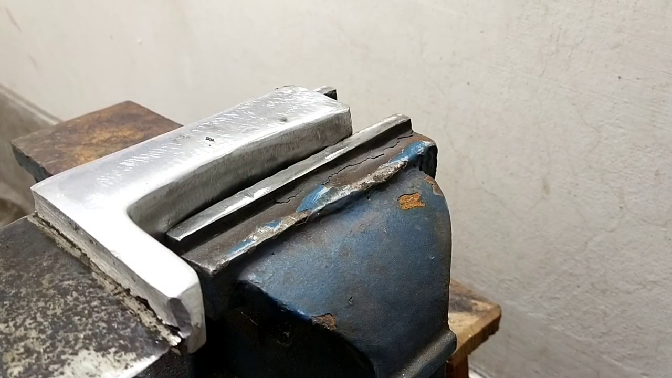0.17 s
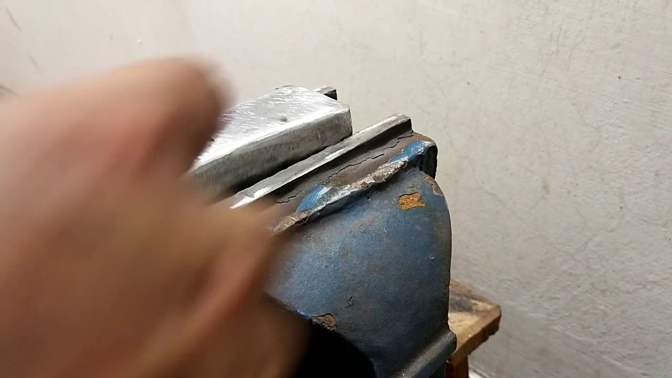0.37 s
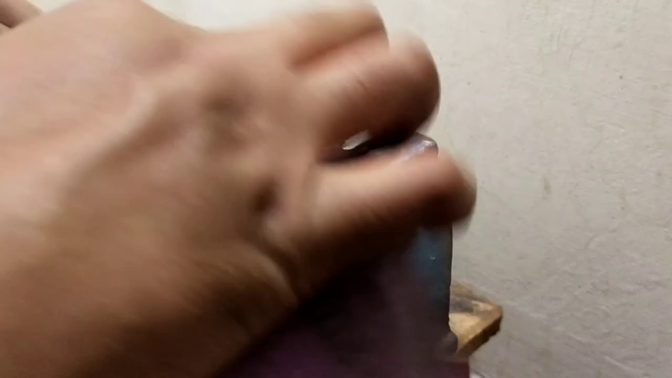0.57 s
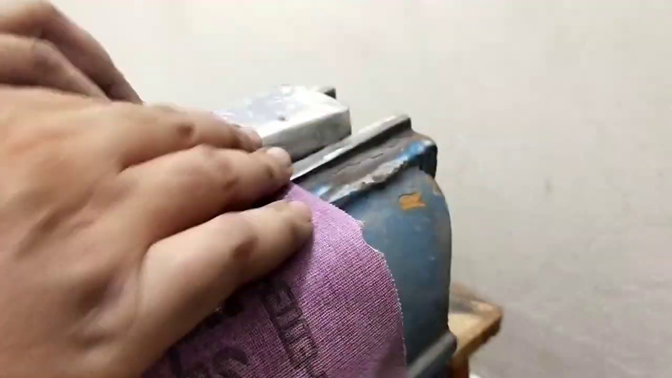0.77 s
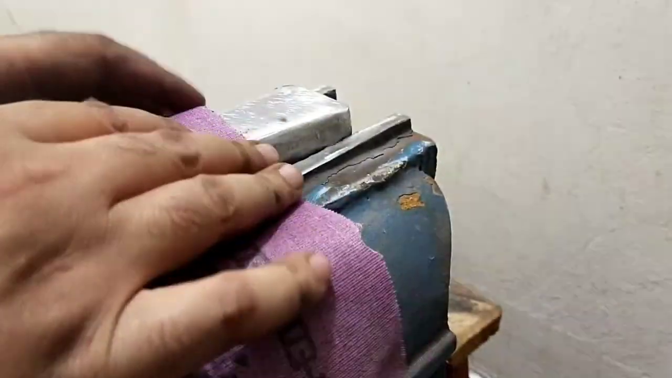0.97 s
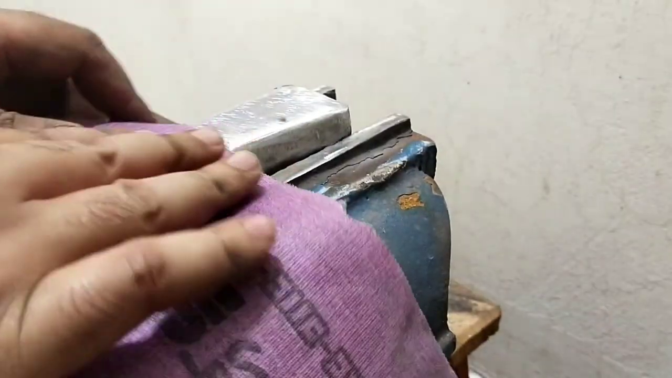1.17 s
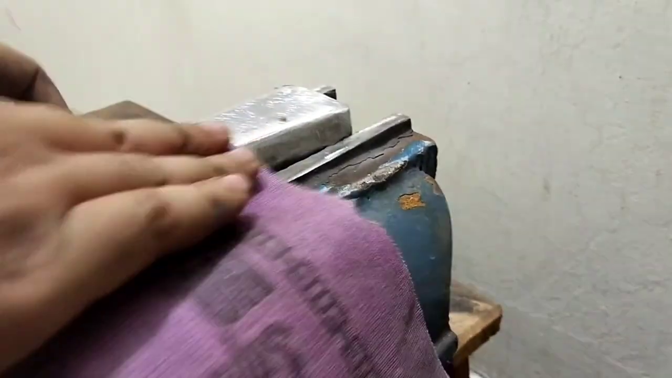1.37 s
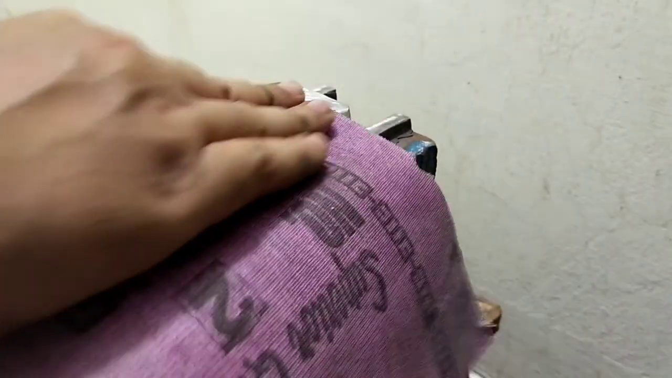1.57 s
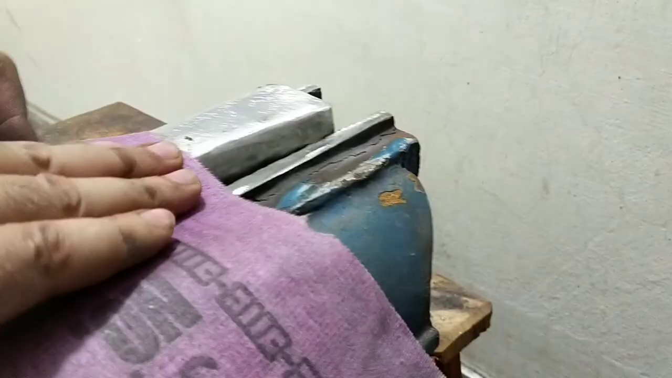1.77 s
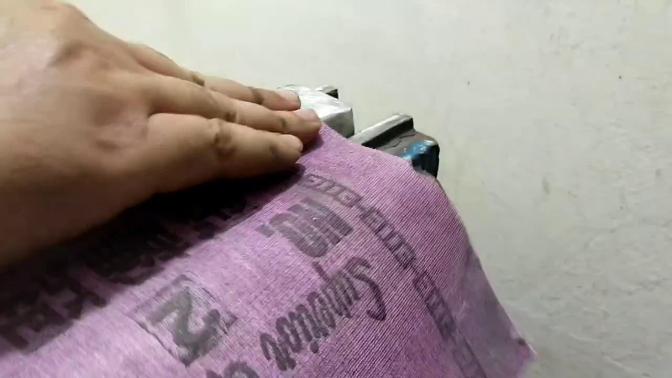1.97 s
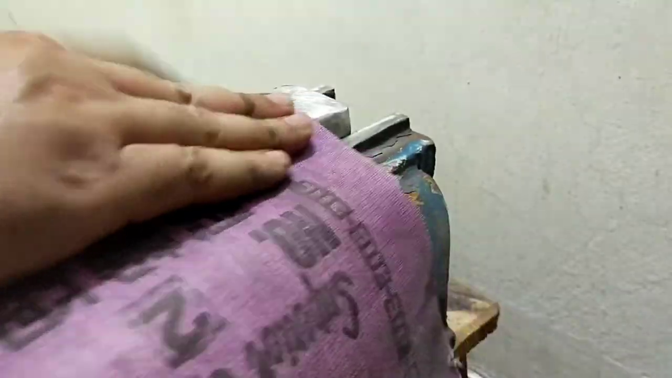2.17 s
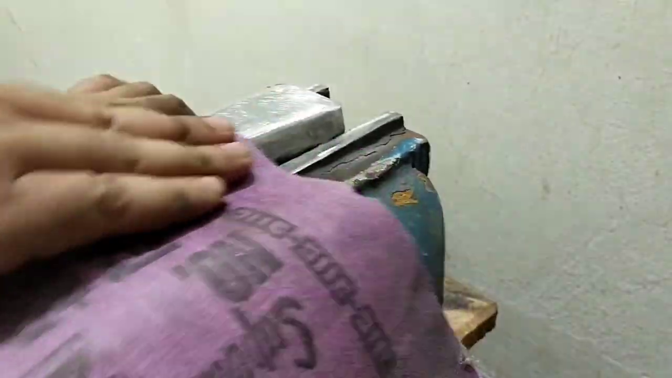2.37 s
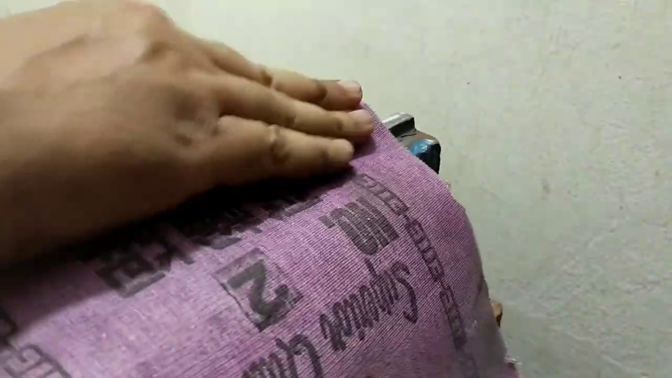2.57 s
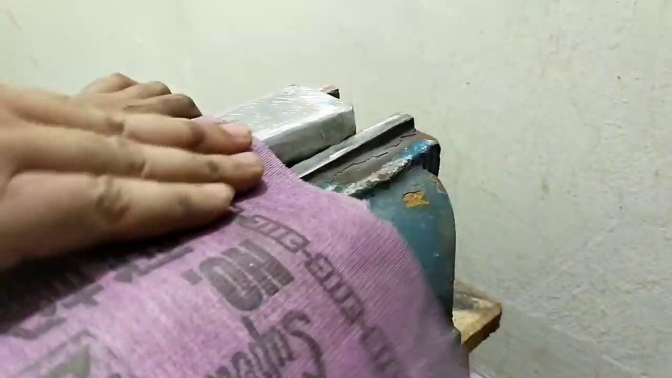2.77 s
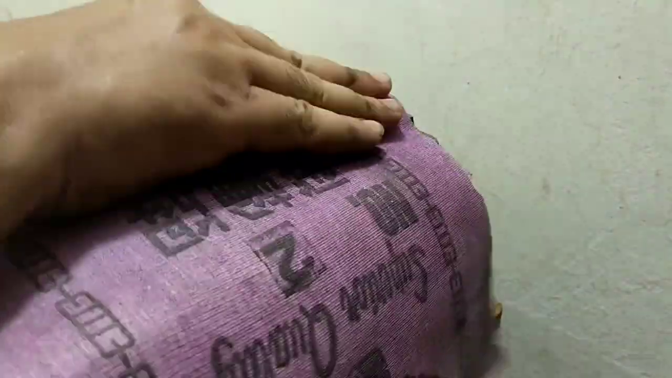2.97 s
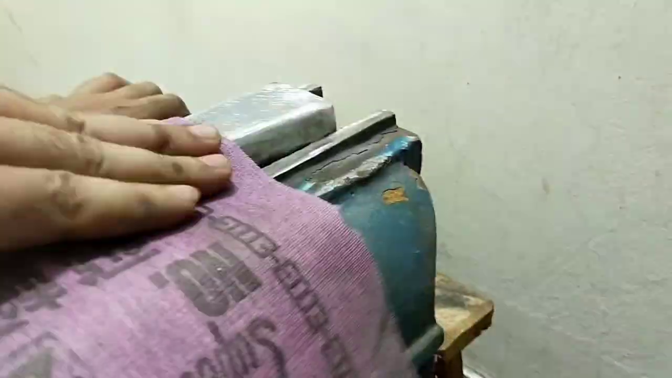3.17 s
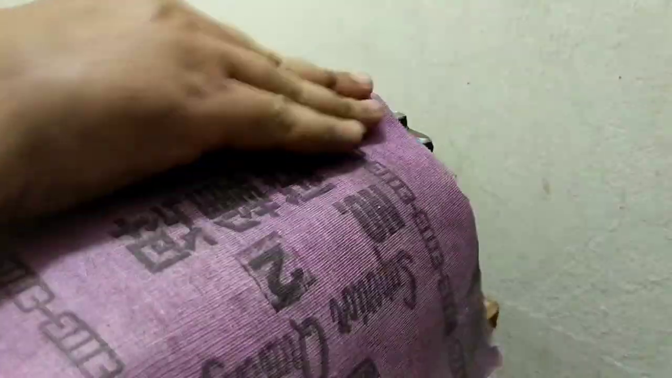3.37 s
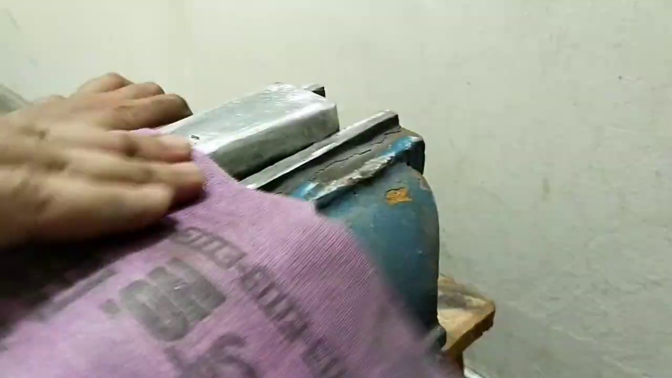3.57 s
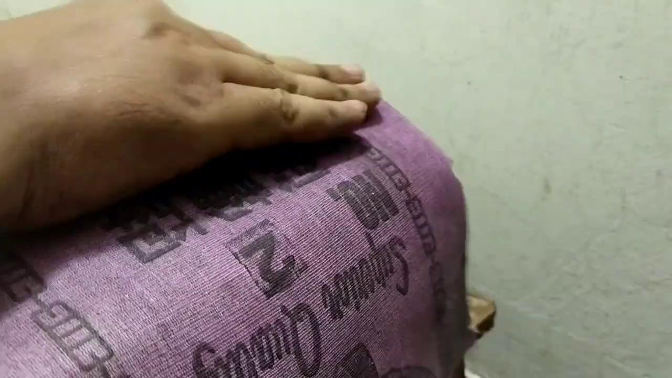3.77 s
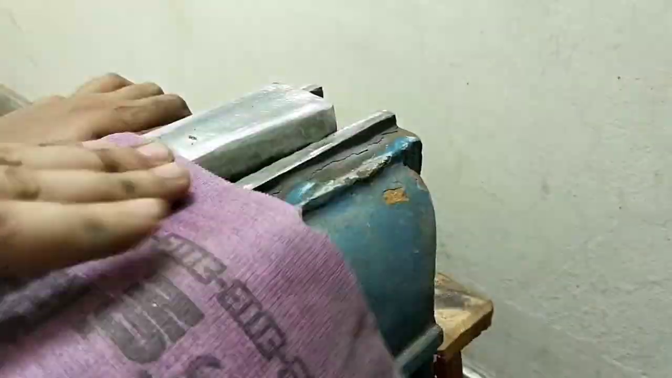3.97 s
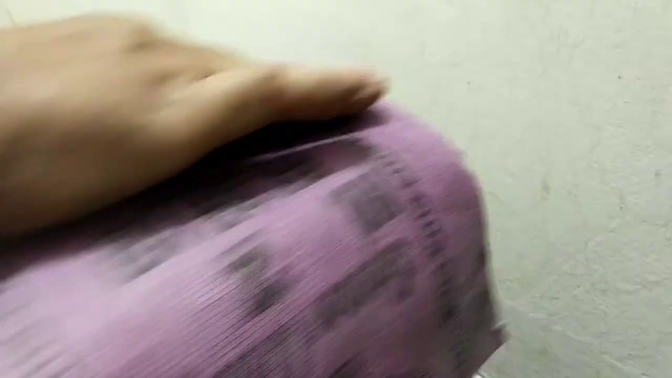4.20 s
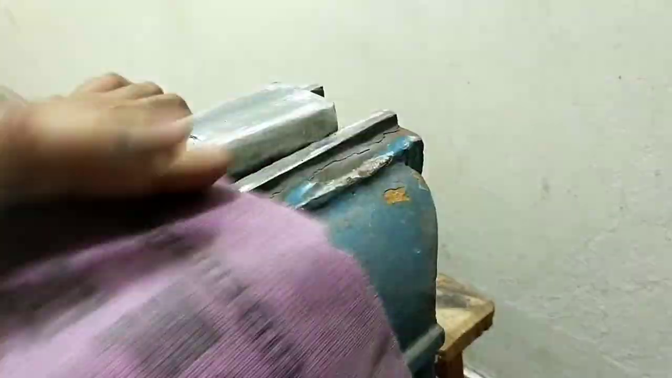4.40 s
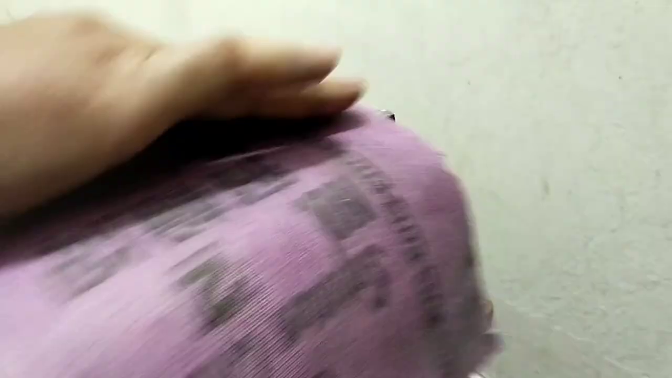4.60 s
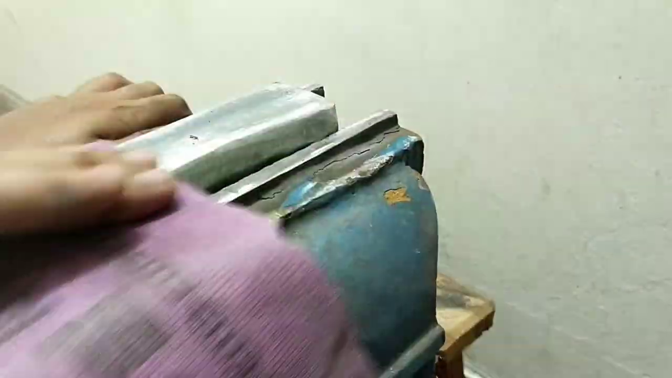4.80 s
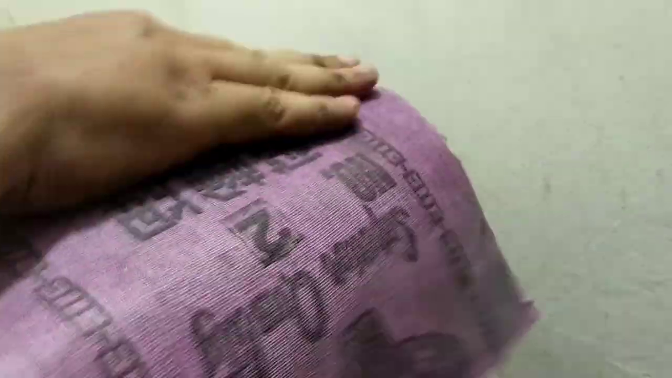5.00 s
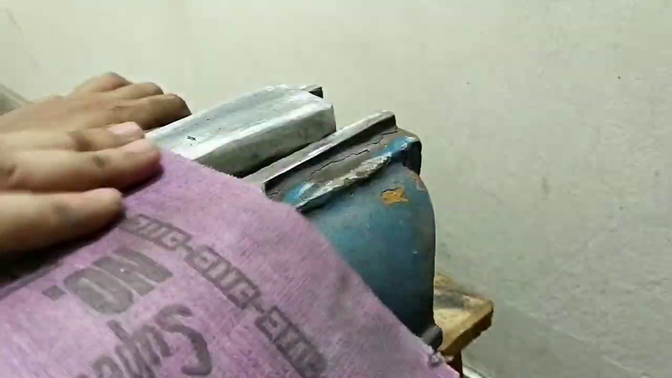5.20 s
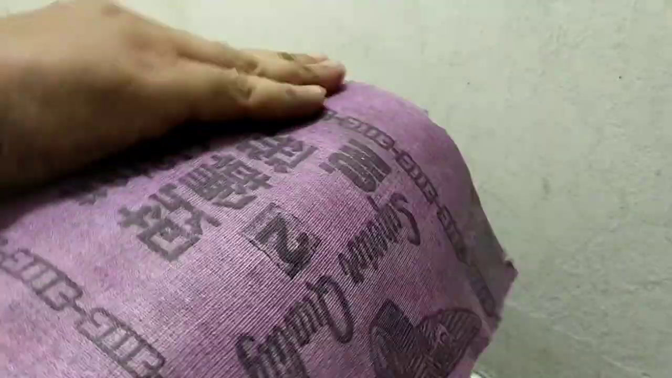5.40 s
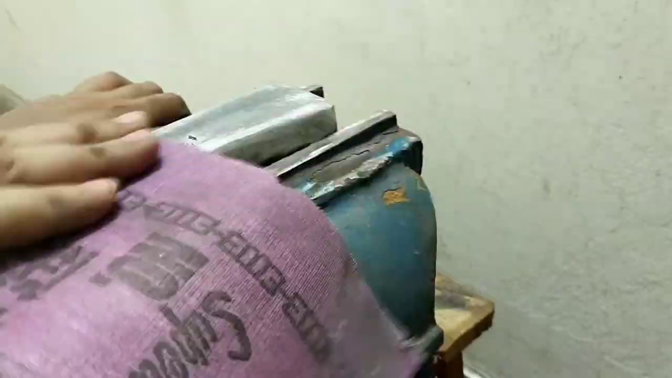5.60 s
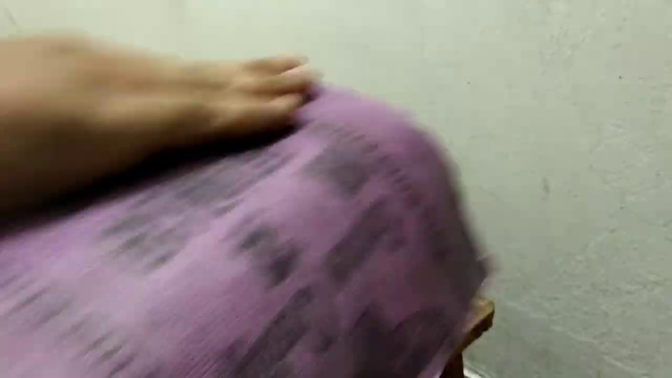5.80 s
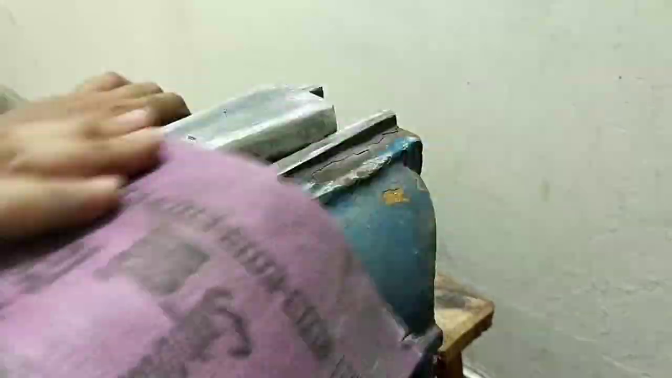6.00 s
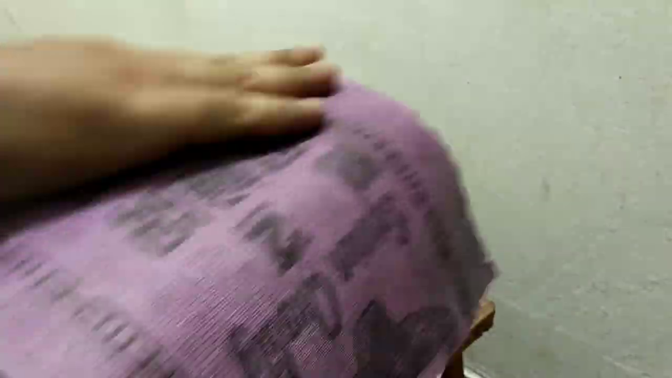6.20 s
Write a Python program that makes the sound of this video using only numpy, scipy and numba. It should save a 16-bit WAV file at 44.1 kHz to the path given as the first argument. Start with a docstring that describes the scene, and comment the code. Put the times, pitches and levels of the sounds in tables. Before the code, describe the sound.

A soft, dull knock on a workbench is followed by the rustle and crackle of abrasive cloth being laid over a steel blade in a vise. Then a hand rubs it quickly back and forth, making gritty, rasping strokes that grow louder, with occasional small snaps from the sheet. The sound is close, in a small workshop with a short echo and a faint low hum.

```python
"""In a small, humming workshop, a sheet of abrasive cloth is rubbed over a steel blade held in a vise.
After a soft knock on the bench, the sheet rustles as it is picked up and laid in place.
Then a hand pulls it to and fro: grit scratches the steel, and the taut sheet rasps and drums along.
Now and then it snaps, as the sheet buckles or a coarse grain catches."""
import numpy as np
from scipy import signal
from scipy.fft import rfft, irfft, next_fast_len
from scipy.ndimage import uniform_filter1d
from numba import njit
import sys
import numpy as np
from scipy import signal
from scipy.fft import rfft, irfft, next_fast_len
from scipy.io import wavfile
from scipy.ndimage import uniform_filter1d
from numba import njit

SR = 44100
rng = np.random.default_rng(int(sys.argv[2]) if len(sys.argv) > 2 else 0)


def pcm_store(signal):
    """Save signal as 16-bit PCM."""
    levels = np.round(np.clip(np.atleast_2d(signal), -1, 1) * 32767)
    wavfile.write(sys.argv[1], SR, levels.astype(np.int16).T)


N = 275625
TIME = np.arange(N) / SR
FFT_SIZE = next_fast_len(N + SR, True)
HZ = np.maximum(np.arange(FFT_SIZE // 2 + 1) * SR / FFT_SIZE, 1)
LEFT_RIGHT = np.array([[.5], [-.5]])  # splits a left-minus-right level between the two sides

# The hand's strokes, a push and a pull in turn, with levels relative to one another:
# start_s, level_db, speed_up_s, slow_down_s, rasp_db, drum_db, ring_hz
STROKES = [(1.383, -21.5, 0.077, 0.083, 0, -0.5, 3600.0), (1.608, -21, 0.053, 0.1, -3, 3.5, 3830),
           (1.823, -20, 0.064, 0.15, 2.5, 6.5, 3770), (2.207, -22.5, 0.099, 0.12, -1, -2.5, 2680.0),
           (2.407, -19.5, 0.054, 0.1, 2, 3, 2840.0), (2.636, -18.5, 0.036, 0.11, 1.0, 2.5, 890.0),
           (2.831, -16, 0.06, 0.12, 3, -4, 3470.0), (3.052, -13.5, 0.062, 0.093, -1, 1.5, 1160),
           (3.241, -14, 0.054, 0.11, 1.5, -1.5, 1180), (3.423, -14, 0.05, 0.088, -1, -0.5, 4200),
           (3.613, -14.5, 0.067, 0.11, 0, -1.0, 1200.0), (3.809, -13.5, 0.073, 0.11, -3, -4.5, 4150),
           (4.009, -15.0, 0.085, 0.082, 1, 0, 4030.0), (4.211, -19, 0.041, 0.078, -2.5, -2.5, 4960.0),
           (4.428, -15, 0.07, 0.1, 0, 0.5, 5350.0), (4.622, -15.5, 0.042, 0.11, -1.5, -2, 5300.0),
           (4.829, -16, 0.079, 0.099, -1.5, 1.5, 4540.0), (5.048, -13.0, 0.1, 0.11, -2.5, 1, 5230),
           (5.275, -14.5, 0.043, 0.14, 1, -3, 2110.0), (5.483, -14.0, 0.069, 0.09, -1, 0, 1960),
           (5.685, -14, 0.061, 0.13, 3.5, -0.5, 1810), (5.889, -14, 0.067, 0.098, 1.5, 1, 1940),
           (6.093, -13.5, 0.079, 0.13, 3, 1.5, 2120)]


def from_db(db):
    """Turn decibels into a number to multiply by."""
    return 10 ** (np.asarray(db) / 20)


def rms_one(x):
    """Scale a signal so that its average strength (rms) is 1."""
    return x / np.sqrt(np.mean(x ** 2) + 1e-20)


def over_time(points):
    """Join (time_s, value) points with straight lines."""
    return np.interp(TIME, *np.transpose(points))


def over_hz(points):
    """Join (pitch_hz, value) points, giving each octave the same room."""
    hz, value = np.transpose(points)
    return np.interp(np.log(HZ), np.log(hz), value)


def lifts(peaks):
    """Decibels that resonances add at each frequency."""
    return sum(db / (1 + (2 * (HZ - hz) / width) ** 2) for hz, width, db in peaks)


def filtered(x, response):
    """Turn each frequency up or down by its own gain."""
    return irfft(rfft(x, FFT_SIZE) * response, FFT_SIZE)[..., :N]


def below(hz, order=4):
    """Gains that keep what lies below hz and fade out what lies above."""
    return 1 / (1 + (HZ / hz) ** order)


def drift(rate_hz):
    """A smooth random wobble of about size 1, worked out every 40 samples."""
    keep = np.exp(-2 * np.pi * rate_hz * 40 / SR)
    noise = rng.standard_normal(N // 40 + 2002)
    slow = signal.lfilter([1], [1, -2 * keep, keep * keep], noise)[2000:]
    return np.interp(np.arange(N) / 40, np.arange(len(slow)), rms_one(slow))


def grains(per_s, spread_db):
    """Two unrelated streams of tiny hits of uneven size."""
    sizes = from_db(spread_db * np.minimum(rng.exponential(1, (2, N)), 4))
    signs = rng.choice([-1, 1], (2, N))
    hits = rng.random((2, N)) < per_s / SR
    return rms_one(sizes * signs * hits)


def radiate(pair, spectrum_db):
    """Colour two noises as one wide source: lows reach both ears alike, highs come from different spots."""
    # How alike the two ears' sounds are: pitch_hz, likeness (held to 0..1 below)
    likeness = [(100, 1.5), (700, 0.9), (1300, 1.2), (2000, -0.23), (3500, 0.1955), (7000, 0.08),
                (10000, 0.01)]
    alike = np.clip(over_hz(likeness), 0, 1)
    mid, side = filtered(pair, from_db(spectrum_db) * np.sqrt([1 + alike, 1 - alike]))
    return rms_one(np.array([mid + side, mid - side]))


def bursts(rows):
    """Levels that jump up and die away, from rows of start_s, level_db, fade_s (time to fall 60 dB)."""
    out = np.zeros(N)
    for start_s, db, fade_s in rows:
        first = int(start_s * SR)
        age = TIME[:min(N - first, SR // 2)]
        out[first:first + len(age)] += from_db(db - 60 * age / fade_s)
    return out


@njit
def resonance(x, hz, width):
    """Keep a band around a pitch that may move; width is a share of that pitch."""
    out = np.zeros_like(x)
    for side in range(2):
        band, low = 0., 0.
        for i in range(x.shape[1]):
            tuning = np.tan(np.pi * hz[i] / SR)
            passed = (band + tuning * (x[side, i] - low)) / (1 + tuning * (tuning + width))
            band, low = 2 * passed - band, low + 2 * tuning * passed
            out[side, i] = width * passed
    return out


def steady_band(x, levels, hz, width):
    """A resonance that stays at one pitch while its level follows (time_s, level_db) points."""
    return from_db(over_time(levels)) * resonance(x, np.full(N, float(hz)), width)


def background(mains_hz=100, mains_db=-9, waver_db=3.0):
    """A low rumble with a wavering hum from the mains power, and faint air noise."""
    # Tone colour of the rumble and of the air: pitch_hz, level_db
    rumble_colour = [(25, -33), (55, -12), (80, -9), (100, 4), (145, -5.5), (200, -21), (400, -55),
                     (2000, -68)]
    air_colour = [(120, -23), (200, 7.5), (1220, -5), (1490, 4.5), (1630, 0.5), (2550, -5), (2750, -2),
                  (3350, -8.5), (15000, -22)]
    # A thin, faint ring in the air noise: pitch_hz, width_hz, lift_db
    air_ring = [(2770, 50, 11)]
    # How the rumble with its hum, and the air, rise and fall: time_s, level_db
    hum_levels = [(0, -49.5), (.75, -47), (.9, -65), (2.0, -59), (2.38, -72), (2.55, -45), (2.75, -44.5),
                  (3.0, -54.5), (5.0, -57.5), (5.15, -46), (5.45, -57), (6.0, -63), (6.25, -45)]
    air_levels = [(0.1, -52.5), (1.3, -52), (2.2, -54)]
    mains = np.sqrt(2) * np.sin(2 * np.pi * mains_hz * TIME + 0.2 * drift(2.8))
    mains *= from_db(mains_db + waver_db * drift(7.2))
    rumble = radiate(rng.standard_normal((2, N)), over_hz(rumble_colour))
    air = radiate(rng.standard_normal((2, N)), over_hz(air_colour) + lifts(air_ring))
    return (rumble + mains) * from_db(over_time(hum_levels)) + air * from_db(over_time(air_levels))


def knock(start_s=0.1762, level_db=-19, contact_s=0.0027):
    """A dull, soft bump makes the heavy bench ring for a moment."""
    # The bench's own tones: pitch_hz, relative_db, fade_s
    bench_tones = [(172, 0, 0.028), (410, -1.2, 0.017)]
    age = TIME - start_s
    ringing = sum(bursts([(start_s, level_db + db, fade_s)]) * np.sin(2 * np.pi * hz * age)
                  for hz, db, fade_s in bench_tones)
    return ringing * np.clip(age / contact_s, 0, 1)


def sheet_on_blade_db():
    """The sheet on the clamped blade favours some pitches and weakens one."""
    # Its resonances and one dip: pitch_hz, width_hz, lift_db
    sheet_rings = [(368, 28, 4), (437, 57, 6), (621, 58, 5), (800, 200, 4), (1160, 160, 1.5),
                   (1506, 220, 4.5), (1770, 100, 3), (5800, 350, -2.5)]
    return lifts(sheet_rings)


def handling(flutter_db=1.5):
    """Loose cloth slides and crackles under the fingers: each move swells, then dies away."""
    # The sheet is grabbed, bent and slid into place: start_s, level_db, swell_s, fade_s, crisp_db
    moves = [(0.218, -41.5, .005, 0.57, -5.5), (0.3355, -30, .002, 0.14, 4.5), (0.35, -39, 0.01, 0.9, 6.5),
             (0.416, -26.5, 0.0036, 0.49, 3), (0.5, -37, 0.079, 0.69, 5), (0.62, -30.5, 0.024, 0.26, -9),
             (0.725, -30.5, 0.0044, 0.27, 0.5), (0.8, -35.5, .003, 0.056, 2), (0.81, -43.5, .04, 1, -4.5),
             (0.987, -34.5, .002, .04, -10), (1.02, -38, 0.095, 1, 0), (1.29, -36, 0.042, 0.3, -7),
             (1.74, -26, 0.022, 0.71, -14)]
    # Tone colour of the rustle: pitch_hz, level_db
    rustle_colour = [(50, -25), (120, 4), (300, -3), (700, -2), (1200, 1.5), (2500, 0.5), (4000, -1.5),
                     (5600, -6), (9000, -11), (16000, -12.5)]
    # Thin rings of the vise, stirred by the hand: pitch_hz, width_hz, lift_db
    vise_rings = [(738, 36, 5.5), (2790, 32, 4), (3720, 80, 4.5)]
    colour_db = over_hz(rustle_colour) + sheet_on_blade_db() + lifts(vise_rings)
    cloth = radiate(grains(per_s=4000, spread_db=-1.5), colour_db) * from_db(flutter_db * drift(45))
    dull = filtered(cloth, below(1670))
    rustle_power, crackle_power = 0, 0
    for start_s, db, swell_s, fade_s, crisp_db in moves:
        swell = np.clip((TIME - start_s) / swell_s, 0, 1)
        fade_db = 60 * np.clip((TIME - start_s - swell_s) / fade_s, 0, 2)
        move = swell * from_db(db - fade_db)
        rustle_power += move ** 2
        crackle_power += (move * from_db(crisp_db)) ** 2
    return dull * np.sqrt(rustle_power) + (cloth - dull) * np.sqrt(crackle_power)


def snaps(crack_db=-2.0, crack_fade_s=.007, crack_delay_s=.0013, rattle_db=-16.0, rattle_fade_s=0.016):
    """The sheet buckles or a coarse grain catches: a bright crack with a brief rattle of the sheet."""
    # Each snap: start_s, relative_db
    snap_times = [(0.337, -39), (0.3587, -24), (0.421, -13), (0.7287, -34), (0.7537, -29), (1.1402, -24),
                  (1.196, -28), (1.2378, -27.5), (1.4468, -15), (1.4636, -11), (1.6305, -13), (1.6536, -7),
                  (2.088, -41), (2.155, -40), (2.2186, -22), (2.2573, -12), (2.2956, -9), (2.311, -19),
                  (2.42, -17), (2.5333, -6), (2.6523, -7.5), (2.8403, -24), (4.2302, -19), (4.2482, -19),
                  (4.6265, -11.5), (4.7507, -10), (4.855, -14), (5.2836, -12)]
    # Tone colour of a snap: pitch_hz, level_db
    snap_colour = [(100, -28), (1000, -17), (4000, 11.5), (7000, 9), (16000, 0)]
    crack = bursts([(s + crack_delay_s, db + crack_db, crack_fade_s) for s, db in snap_times])
    rattle = bursts([(s, db + rattle_db, rattle_fade_s) for s, db in snap_times])
    return radiate(rng.standard_normal((2, N)), over_hz(snap_colour)) * (crack + rattle)


def hand_motion(longest_s=0.2215, turn_speed=0.15, level_db=-2.5, let_go_db_per_s=183, judder_db=1.0):
    """The hand speeds up, runs on and slows before each turn; if it rests, its pressure fades."""
    start_s, stroke_db, speed_up_s, slow_down_s = np.transpose(STROKES)[:4]
    length_s = np.minimum(np.diff(start_s, append=np.inf), longest_s)
    stroke = np.maximum(np.searchsorted(start_s, TIME) - 1, 0)
    age, length = TIME - start_s[stroke], length_s[stroke]
    bite = np.sin(np.pi / 2 * np.clip(age / speed_up_s[stroke], 0, 1)) ** 0.85
    release = np.sin(np.pi / 2 * np.clip((length - age) / slow_down_s[stroke], 0, 1)) ** 2.41
    speed = turn_speed + (1 - turn_speed) * bite * release  # 1 is full speed
    pressure_db = stroke_db[stroke] + level_db - let_go_db_per_s * np.maximum(age - length, 0)
    force = uniform_filter1d(from_db(pressure_db) * (age > 0), size=400)
    force *= from_db(judder_db * drift(47))  # the grip is never quite even
    place = -.5 * (-1.) ** stroke * np.cos(np.pi * np.clip(age / length, 0, 1))  # -.5 back, .5 front
    return stroke, speed, force, place


def shimmer(x, depth_db, rate_hz):
    """Narrow bands of pitch swell and fade at random, giving the scratch a shifting colour."""
    spectrum, out, lower = rfft(x, FFT_SIZE), 0, 0
    edges_hz = np.linspace(np.sqrt(300), np.sqrt(9000), 36) ** 2
    for upper in [below(hz, order=50) for hz in edges_hz] + [1]:
        band = irfft(spectrum * (upper - lower), FFT_SIZE)[:, :N]
        out += band * from_db(depth_db * drift(rate_hz))
        lower = upper
    return rms_one(out)


def sanding(ring_db=-10.5):
    """The faster the hand goes, the more grains strike the steel, and the brighter the scratch."""
    # Tone colour of grit on steel: pitch_hz, level_db
    scratch_colour = [(40, -18), (80, -27), (150, -7), (300, -8.5), (600, -4), (1200, 0), (2500, 5),
                      (4500, 2.5), (5900, -0.5), (8500, -4.5), (11500, -4.5), (16000, -5)]
    # The grit's high sizzle and the sheet's hollow rasp on the blade: time_s, relative_db
    sizzle_levels = [(1.4, -6), (2.2, -15), (3.3, -28), (3.7, -11), (4.1, -7), (4.7, -6.5), (5.4, -29)]
    hollow_levels = [(2.6, -24), (2.95, -1), (3.35, -6), (3.6, -13), (4.7, -35), (4.95, 5), (5.2, -18),
                     (6.2, -31)]
    stroke, speed, force, place = hand_motion()
    rasp_db, drum_db, ring_hz = np.transpose(STROKES)[-3:, stroke]
    # Towards the front of its travel, the sheet rasps more, drums less and rings lower.
    rasp_db = rasp_db + 4.5 * place - 0.4
    drum_db = drum_db - 4.5 * place + 0.04
    ring_hz = ring_hz * 2 ** (-0.023 * place)
    grit = grains(per_s=5000 + 14000 * speed, spread_db=2.0)
    scratch = radiate(grit, over_hz(scratch_colour) + sheet_on_blade_db())
    scratch = shimmer(scratch, depth_db=2.5, rate_hz=14.3)
    ring = from_db(ring_db) * resonance(scratch, ring_hz, width=0.21)  # the free part of the sheet
    sizzle = steady_band(scratch, sizzle_levels, hz=6700, width=0.38)
    hollow = steady_band(scratch, hollow_levels, hz=1530, width=0.098)
    scratch = scratch + ring + sizzle + hollow
    low, low_and_mid = filtered(scratch, below(630)), filtered(scratch, below(2000))
    hiss = (scratch - low_and_mid) * speed
    rasp = (low_and_mid - low) * from_db(rasp_db) * speed ** 0.72
    drum = low * from_db(drum_db) * speed ** 0.47  # the sheet drums even when it moves slowly
    return force * (hiss + rasp + drum)


def wall_echo(x, level_db=-9.5, fade_s=0.17, dull_hz=13000):
    """Bare walls send back a short wash of echoes, a little duller than the sound itself."""
    age = TIME[:SR // 2]
    tail = rng.standard_normal((2, len(age))) * from_db(-60 * age / fade_s) * (age > .004)
    tail /= np.sqrt(np.sum(tail ** 2, axis=1, keepdims=True))
    return from_db(level_db) * filtered(x, rfft(tail, FFT_SIZE) * below(dull_hz))


def scene():
    """All the work at the vise, in its room."""
    # Where the sheet sounds from as the hands shift: time_s, left_minus_right_db
    sheet_position = [(1.5, 0), (2.3, -1), (2.6, 0.6), (4.3, -.5), (4.85, 2), (5.45, 0.8), (6.1, 0.6)]
    pan = from_db(over_time(sheet_position) * LEFT_RIGHT)
    work = pan * (sanding() + handling() + snaps()) + knock()
    return work + wall_echo(work) + background()


def record(dry, left_lag_s=.00015, bass_cut_hz=52, top_cut_hz=15600):
    """Two microphone openings, the left farther and brighter; peaks are rounded, deep bass and top cut."""
    # High resonances of the openings: pitch_hz, width_hz, lift_db
    opening_rings = [(6850, 1900, 6), (14800, 2100, 2.5)]
    # Balance of the two sides: pitch_hz, left_minus_right_db
    balance = [(100, -1), (400, -3), (1000, -1.3), (2500, -0.9), (7000, 0.4), (11000, 1), (14500, 6.5)]
    response = from_db(lifts(opening_rings) + over_hz(balance) * LEFT_RIGHT) * (1 - below(bass_cut_hz))
    lag = np.exp(-2j * np.pi * HZ * np.array([[left_lag_s], [0]]))
    rounded = np.tanh(filtered(dry, response * lag))
    top_cut = signal.ellip(12, .1, 80, top_cut_hz, fs=SR, output="sos")
    return signal.sosfilt(top_cut, rounded)


dry = scene()
out = record(dry)
pcm_store(out)
```